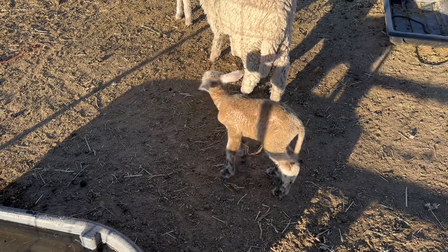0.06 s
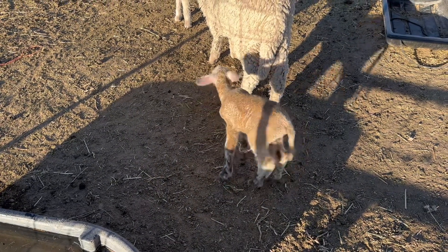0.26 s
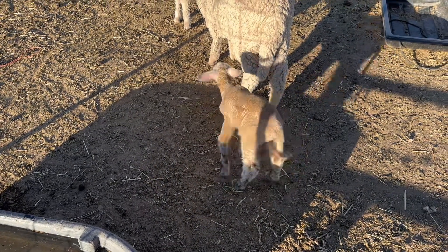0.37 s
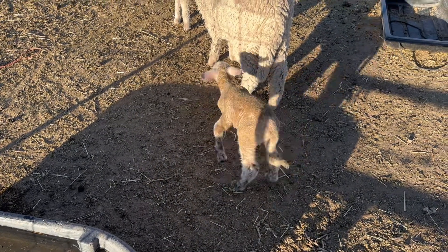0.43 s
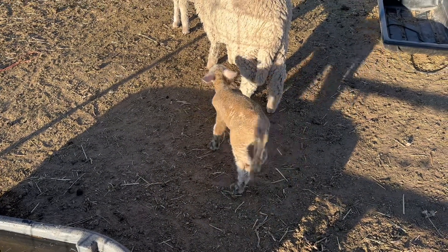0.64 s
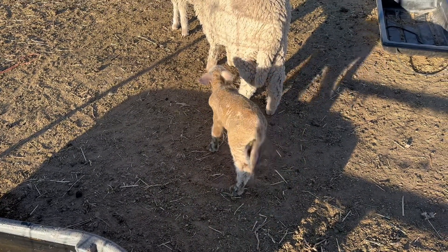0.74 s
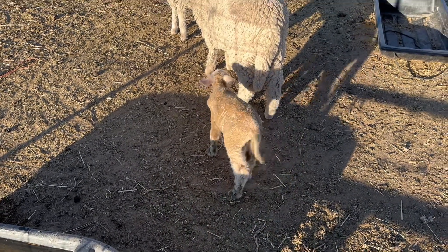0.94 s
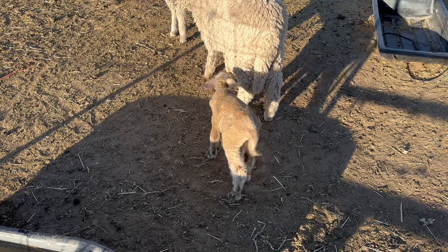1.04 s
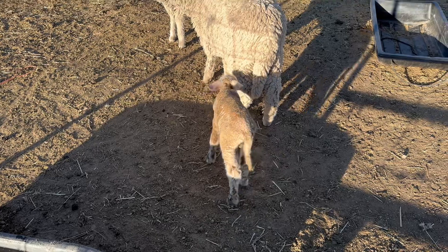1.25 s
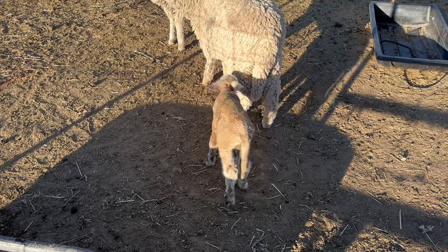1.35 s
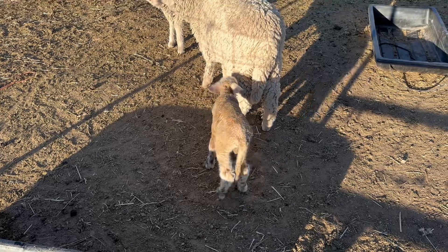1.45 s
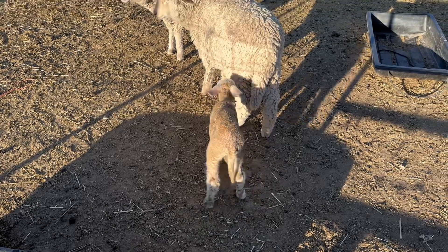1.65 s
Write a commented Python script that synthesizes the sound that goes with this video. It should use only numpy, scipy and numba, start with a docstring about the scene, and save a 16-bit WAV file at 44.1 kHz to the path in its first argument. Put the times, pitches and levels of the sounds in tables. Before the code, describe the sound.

A sheep gives one long, rattling bleat close by in an outdoor pen.

```python
"""A sheep gives one long bleat close by in an open pen. Its vocal folds are the source and its vocal tract
the filter: a closed-mouth grunt and hum, then the lips part, the voice rattles with alternating strong
and weak pulses, clears, sags and breaks into a rasp. Reflections make the pen ring faintly.
Air buffets the microphone, with a few dull handling bumps and two ticks of straw near the end."""
import sys
import numpy as np
from scipy import signal
from scipy.fft import rfft, irfft
from scipy.io import wavfile
from scipy.ndimage import uniform_filter1d
from numba import njit

SR = 44100
rng = np.random.default_rng(int(sys.argv[2]) if len(sys.argv) > 2 else 0)


def waveform_to_disk(signal):
    """Save audio, clipped to [-1, 1], as 16-bit WAV at the path in sys.argv[1]."""
    frames = np.transpose(np.atleast_2d(signal))
    scaled = np.clip(frames, -1, 1) * 32767
    samples = np.round(scaled).astype(np.int16)
    wavfile.write(sys.argv[1], SR, samples)


N = 74970

# Vibration rate of the vocal folds. Each row: time in seconds, pitch in Hz.
FOLD_PITCH = [(.15, 133), (.178, 110), (.2, 141), (.25, 167), (.3, 177), (.344, 181.3), (.366, 175.9),
              (.382, 182), (.472, 179.4), (.57, 179.5), (.606, 177.8), (.67, 180.6), (.794, 181.8),
              (.816, 174.5), (.844, 173), (.866, 175.8), (.906, 173.3), (.924, 169), (.95, 172.6),
              (.978, 171), (1.02, 128)]
# Push of the voice. Each row: time in seconds, level in dB.
VOCAL_EFFORT = [(.11, -47), (.136, -18), (.156, -13.5), (.17, -21), (.19, -16.5), (.213, -9), (.27, -4.5),
                (.34, 0.5), (.37, -1), (.42, 0), (.6, 0.48), (.79, -0.18), (.85, -3.5), (.905, -2.5),
                (.933, -7.5), (.955, -3), (.975, -2.5), (.99, -12), (1.015, -15.5), (1.05, -41),
                (1.075, -58.5)]
WAVER_SHARE, WAVER_DB, WAVER_RATE_HZ = .002, .25, 60  # unsteadiness of pitch and push
# Alternation of strong and weak pulses. Each row: time in seconds, depth from 0 to 1.
RATTLE_DEPTH = [(.335, 0), (.39, .5), (.46, .7), (.51, .85), (.56, .65), (.605, .65), (.635, .06),
                (.8, .05)]
SWING_SHARE, SWING_S = .3, .000036  # pulse size and timing at full rattle
# Irregularity of the folds. Each row: time in seconds, roughness from 0 to 1.
ROUGHNESS = [(.14, .33), (.178, .55), (.21, .17), (.335, .1), (.365, .25), (.41, .12), (.6, .13),
             (.65, .11), (.78, .11), (.85, .14), (.965, .14), (.992, .85)]
JITTER_S, SHIMMER_DB, PUFF_DB = .0007, 3.5, -5  # at full roughness
PUFF_DECAY_CYCLES = .5
# Opening of the mouth. Each row: time in seconds, share from 0 to 1.
MOUTH_OPENING = [(.303, 0), (.31, .5), (.335, .7), (.385, 1), (.978, 1), (1.015, .42)]
# Response of the throat with the mouth open. Each row: frequency in Hz, gain in dB.
ORAL_TRACT = [(90, -55.5), (178, -38), (265, -55.5), (360, -46.5), (450, -45.5), (540, -35), (630, -27),
              (720, -29.5), (810, -22.5), (890, -25), (1060, -45.5), (1260, -36), (1350, -37),
              (1450, -34.5), (1540, -39), (1620, -27), (1730, -34), (1810, -28), (1965, -27.5), (2090, -34),
              (2170, -34), (2260, -31.5), (2370, -33), (2560, -54), (2720, -48.5), (3100, -43.5),
              (3450, -54), (3800, -54), (3980, -56), (4150, -65), (4680, -70.5), (5100, -63.5),
              (6200, -93.5), (9000, -84), (16000, -100)]
# Response of nose and throat with the mouth shut. Each row: frequency in Hz, gain in dB.
NASAL_TRACT = [(70, -48.5), (125, -29.5), (175, -29), (225, -27.5), (290, -53), (360, -54), (520, -45.5),
               (660, -35), (870, -41), (1030, -49.5), (1190, -39.5), (1400, -44.5), (1850, -45),
               (2130, -59), (2350, -70), (2750, -54.5), (3300, -54.5), (4100, -72), (5800, -84),
               (7200, -66), (8500, -83.5), (16000, -84)]
# Spectrum of the sharp edge of each pulse. Each row: frequency in Hz, gain in dB.
EDGE_COLOUR = [(2500, -100), (5500, -72.5), (8200, -74), (9300, -68), (9900, -55), (10900, -57),
               (12200, -67.5), (13200, -74), (14700, -72.5), (16000, -76.5)]
EDGE_EXPONENT, EDGE_T60_S, EDGE_DIRECT_DB, EDGE_AIR_DB = 2.2, .014, -5, -9
# Strength of the upper throat resonances. Each row: time in seconds, gain in dB.
TWANG_GAIN = [(.31, -22), (.345, 1), (.42, 0), (.55, 3.5), (.79, -1), (.82, 5), (.85, 1), (.9, 3.5),
              (.935, 0), (.99, 7)]
TWANG_BAND_HZ = (2550, 4400)
# Resonance of the parting lips. Each row: time in seconds, centre in Hz, gain in dB.
LIP_RESONANCE = [(.305, 5400, -80), (.315, 5500, -62.5), (.333, 6230, -66.5), (.352, 7500, -55),
                 (.41, 7400, -69.5)]
LIP_WIDTH_HZ = 430.
# Breath in the call. Each row: time in seconds, level in dB.
HISS_LEVEL = [(.11, -99), (.15, -87), (.25, -54.5), (.36, -65), (.4, -61), (.95, -76.5), (1, -62.5),
              (1.04, -63.5), (1.075, -100)]
# Spectrum of the breath. Each row: frequency in Hz, relative level in dB.
HISS_SPECTRUM = [(150, -5.5), (300, 14), (600, -3.5), (1200, -11), (3000, 8.5), (4400, -11), (6200, -7.5),
                 (7200, 2), (8500, -14), (10500, -5.5), (16000, -15.5)]
GROUND_PATHS = [(.0013, .52), (.0034, .48)]
GROUND_TOP_HZ = 9000
# The two microphone ports. Each row: frequency in Hz, left minus right in dB, left lead in radians.
PORT_RESPONSE = [(180, 1, .3), (540, 2, .5), (720, 5, 1.6), (890, 3, .5), (1080, -6, 0), (1260, 6, 2.1),
                 (1440, 1, 2.3), (1625, 2, -2), (1720, 3, 0), (1810, 3, 2.9), (1950, 7, -2.1),
                 (2170, 21, -1.3), (2345, 5, 2.2), (2450, -4, -.9), (2710, 9, .8), (2890, 6, 2.1),
                 (3070, -5, 2.7), (3250, -6, -.5), (3430, 8, -2.1), (3750, 4, -2.4), (3980, -1, -.6),
                 (5100, 0, 0), (7000, 6, 1), (10000, 0, .6)]
# Colour of the early reflections. Each row: frequency in Hz, gain in dB.
SCATTER_COLOUR = [(200, -6), (2000, 0), (4000, 4), (7000, 7), (10000, 5)]
SCATTER_T60_S, SCATTER_DB = .06, -13
# Colour of the ring of the pen. Each row: frequency in Hz, gain in dB.
PEN_COLOUR = [(150, -15.5), (700, -19), (870, -14), (1000, -12.5), (1500, -5), (1740, 5.5), (2100, -10.5),
              (2500, 10.5), (3200, -15.5), (8000, -16)]
PEN_T60_S, PEN_DB, PEN_DELAY_S = .79, -30.5, .042
# Air on the microphone. Each row: time in seconds, level in dB.
BUFFET_LEVEL = [(0, -50), (.1, -56), (.27, -49), (.32, -57.5), (.38, -30), (.52, -40.5), (.96, -42.5),
                (1.005, -52), (1.044, -43), (1.072, -56.5), (1.14, -40), (1.19, -51.5), (1.29, -41),
                (1.38, -41.5), (1.51, -30.5), (1.61, -36.5), (1.65, -52)]
# Spectrum of its rumble. Each row: frequency in Hz, relative level in dB.
BUFFET_SPECTRUM = [(15, -30), (33, -16.5), (55, 6.5), (80, -5.5), (120, -8), (180, -23), (260, -39.5),
                   (400, -62.5), (1000, -83.5)]
# Handling bumps. Each row: start in seconds, pitch in Hz, level in dB, decay time in seconds.
HANDLING_BUMPS = [(0.502, 82, -21.5, 0.015), (0.677, 77.8, -24, 0.022), (1.301, 71, -21.5, 0.013),
                  (1.419, 70, -24.5, 0.014), (1.447, 185, -30, 0.015), (1.46, 170.8, -16.5, 0.0069),
                  (1.486, 58, -17.5, 0.024), (1.543, 154, -31, 0.0081)]
BUMP_RISE_S = .0034
# Snaps of straw. Each row: start in seconds, level in dB.
STRAW_TICKS = [(1.479, -48), (1.568, -63)]
TICK_DECAY_S = .0013
# Spectrum of a snap. Each row: frequency in Hz, relative level in dB.
STRAW_SPECTRUM = [(400, 8), (2500, -10.5), (3800, -1), (5500, -6.5), (10000, -3), (16000, 0)]
# Still air of the yard. Each row: frequency in Hz, relative level in dB.
YARD_SPECTRUM = [(100, 12), (400, 4), (900, -5.5), (1400, -6), (1900, 1), (2600, -8.5), (3600, -14.5),
                 (16000, -21.5)]
YARD_DB, TOP_HZ = -72.5, 15750


def bleat(t):
    """Source and filter: the tract shapes the fold pulses, first through the nose, then the mouth."""
    folds, edge = vocal_folds(t)
    sounding = (t > VOCAL_EFFORT[0][0]) * (t < VOCAL_EFFORT[-1][0])
    push = undb(curve(VOCAL_EFFORT, t) + WAVER_DB * wander(WAVER_RATE_HZ)) * sounding
    mouth = curve(MOUTH_OPENING, t)
    oral = twang(colour(folds * push * mouth, ORAL_TRACT), t)
    nasal = colour(folds * push * (1 - mouth), NASAL_TRACT)
    treble = colour(edge * push ** EDGE_EXPONENT * mouth, EDGE_COLOUR)
    return oral + nasal + lips(folds, t) + treble


def vocal_folds(t):
    """Each cycle releases a pulse and a puff of air; period doubling adds the rattling subharmonic."""
    hz = curve(FOLD_PITCH, t) * (1 + WAVER_SHARE * wander(WAVER_RATE_HZ))
    phase = np.cumsum(hz) / SR
    cycle = np.arange(1, int(phase[-1]))
    onsets = np.interp(cycle, phase, t)
    air, edge_air = rng.standard_normal((2, N))
    jitter, shimmer = rng.standard_normal((N // 100, 2))[cycle].T
    swing = curve(RATTLE_DEPTH, onsets) * (-1) ** cycle
    rough = curve(ROUGHNESS, onsets)
    times = onsets + SWING_S * swing + JITTER_S * rough ** 2 * jitter
    sizes = (1 + SWING_SHARE * swing) * undb(SHIMMER_DB * rough * shimmer)
    pulses = -clicks(times, sizes)
    puff = np.exp(-(phase % 1) / PUFF_DECAY_CYCLES)
    puff *= np.sqrt(hz / SR / np.mean(puff ** 2))  # about unit energy per cycle
    folds = pulses + undb(PUFF_DB) * curve(ROUGHNESS, t) * puff * air
    ringing = undb(EDGE_DIRECT_DB) * pulses + echoes(pulses, t, EDGE_T60_S)[0]
    edge = ringing + undb(EDGE_AIR_DB) * puff * edge_air
    per_harmonic = SR / hz / np.sqrt(2)  # keeps harmonic level independent of pitch
    return folds * per_harmonic, edge * per_harmonic


def twang(x, t):
    """The upper formants, resonances of the throat, swell and flutter."""
    band = signal.sosfiltfilt(signal.butter(4, TWANG_BAND_HZ, "bandpass", fs=SR, output="sos"), x)
    return x + band * (undb(curve(TWANG_GAIN, t)) - 1)


def lips(folds, t):
    """The gap between the parting lips is a resonator that rings briefly and glides upward."""
    times, hz, db = np.array(LIP_RESONANCE).T
    drive = folds * undb(np.interp(t, times, db)) * (t > times[0]) * (t < times[-1])
    return resonate(drive, np.interp(t, times, hz), LIP_WIDTH_HZ)


def hiss(t):
    """Turbulence: air rushes through the nose and the half-open mouth."""
    flowing = (t > HISS_LEVEL[0][0]) * (t < HISS_LEVEL[-1][0])
    return undb(curve(HISS_LEVEL, t)) * flowing * noise(HISS_SPECTRUM)


def ground_smear(x):
    """Multipath: all-pass echoes spread each pulse over milliseconds; the top treble stays sharp."""
    hz = np.fft.rfftfreq(2 * N, 1 / SR)
    spectrum = rfft(x, 2 * N)
    for delay, share in GROUND_PATHS:
        loop = np.exp(-2j * np.pi * hz * delay)
        feedback = share / (1 + (hz / GROUND_TOP_HZ) ** 4)
        spectrum = spectrum * (loop - feedback) / (1 - feedback * loop)
    lag = int(SR * sum(delay for delay, _ in GROUND_PATHS))
    return np.roll(irfft(spectrum), -lag)[:N]


def ports(x):
    """Level and phase differences between the two microphone ports place the voice in stereo."""
    hz = np.fft.rfftfreq(2 * N, 1 / SR)
    centres, _, radians = np.array(PORT_RESPONSE).T
    ratio = undb(across(PORT_RESPONSE, hz))
    lead = across(np.c_[centres, np.unwrap(radians)], hz)
    pair = np.array([ratio, np.exp(-1j * lead)]) * np.sqrt(2 / (1 + ratio ** 2))
    return irfft(rfft(x, 2 * N) * pair)[:, :N]


def pen(voice, t):
    """Reverberation: the pen returns quick early reflections and a faint, delayed ring."""
    delayed = np.interp(t - PEN_DELAY_S, t, colour(voice, PEN_COLOUR))
    ring = undb(PEN_DB) * echoes(delayed, t, PEN_T60_S)
    early = undb(SCATTER_DB) * echoes(colour(voice, SCATTER_COLOUR), t, SCATTER_T60_S)
    return ring + early


def buffeting(t):
    """Pressure fluctuations of moving air make a low rumble, nearly the same at both ports."""
    mid, side = noise(BUFFET_SPECTRUM), noise(BUFFET_SPECTRUM)
    return undb(curve(BUFFET_LEVEL, t)) * (mid + undb(-13) * side * np.array([[1], [-1]]))


def bumps(t):
    """Damped oscillation: each knock on the microphone's housing excites one low mode."""
    out = 0
    for start, hz, db, decay in HANDLING_BUMPS:
        age = np.maximum(t - start, 0)
        rise = 1 - np.exp(-(age / BUMP_RISE_S) ** 2)
        out = out + undb(db) * rise * np.exp(-age / decay) * np.sin(2 * np.pi * hz * age)
    return out


def straw(t):
    """Straw snaps under the hooves; so brief a transient has a broad spectrum."""
    snaps = sum(undb(db) * (t > start) * np.exp(-np.abs(t - start) / TICK_DECAY_S)
                for start, db in STRAW_TICKS)
    return snaps * np.array([noise(STRAW_SPECTRUM), noise(STRAW_SPECTRUM)])


def yard_air():
    """Ambient noise of the yard, uncorrelated between left and right."""
    return undb(YARD_DB) * np.array([noise(YARD_SPECTRUM), noise(YARD_SPECTRUM)])


def undb(db):
    """Decibels to amplitude ratio."""
    return 10 ** (np.asarray(db) / 20)


def curve(table, t):
    """Linear interpolation of a table in time."""
    return np.interp(t, *np.array(table).T)


def across(table, hz):
    """Interpolation of a table's second column along log frequency."""
    rows = np.array(table, float)
    return np.interp(np.log(hz + 1), np.log(rows[:, 0]), rows[:, 1])


def colour(x, table, size=8192):
    """Minimum-phase filter: folding the cepstrum makes the tabulated response causal."""
    gain = undb(across(table, np.fft.rfftfreq(size, 1 / SR)))
    cepstrum = irfft(np.log(gain))
    cepstrum[1:size // 2] *= 2
    cepstrum[size // 2 + 1:] = 0
    return signal.fftconvolve(x, irfft(np.exp(rfft(cepstrum))))[:N]


def noise(table):
    """Filtered white noise of rms 1."""
    x = colour(rng.standard_normal(N), table)
    return x / x.std()


def wander(rate):
    """A moving average of random steps gives a smooth drift of order 1."""
    hold = int(SR / rate)
    steps = np.repeat(rng.standard_normal(N // hold + 1), hold)
    return 1.7 * uniform_filter1d(steps, hold)[:N]


def clicks(times, sizes, order=8):
    """Band-limited impulses: a windowed sinc places each between samples."""
    at = times[:, None] * SR
    taps = at.astype(int) + np.arange(1 - order, order + 1)
    shape = np.sinc(taps - at) * np.cos(np.pi * (taps - at) / (2 * order)) ** 2
    return np.bincount(np.clip(taps, 0, N - 1).ravel(), (sizes[:, None] * shape).ravel(), N)


@njit
def resonate(x, hz, width):
    """Second-order resonator with gain 1 at its moving centre."""
    y, band, low = np.empty(len(x)), 0., 0.
    for i in range(len(x)):
        g, damping = np.tan(np.pi * hz[i] / SR), width / hz[i]
        v = (band + g * (x[i] - low)) / (1 + g * (g + damping))
        band, low, y[i] = 2 * v - band, low + 2 * g * v, damping * v
    return y


def echoes(x, t, t60):
    """Diffuse tail: convolution with exponentially decaying noise, different in each ear."""
    tail = rng.standard_normal((2, N)) * np.exp(-np.log(1000) * t / t60)
    return signal.fftconvolve(x[None], tail / np.linalg.norm(tail[0]), axes=1)[:, :N]


def scene():
    """Superposition of the bleat, its reflections and the background."""
    t = np.arange(N) / SR
    voice = bleat(t) + hiss(t)
    reflections = pen(voice, t)
    yard = yard_air()
    return ports(ground_smear(voice)) + reflections + buffeting(t) + bumps(t) + straw(t) + yard


def record(dry):
    """Band limiting: a steep low-pass cuts the top treble."""
    return signal.sosfilt(signal.ellip(10, .1, 90, TOP_HZ, fs=SR, output="sos"), dry)


dry = scene()
out = record(dry)
waveform_to_disk(out)
```